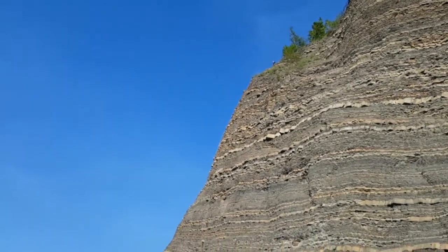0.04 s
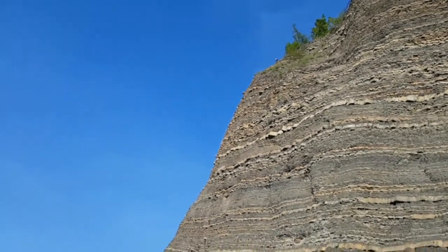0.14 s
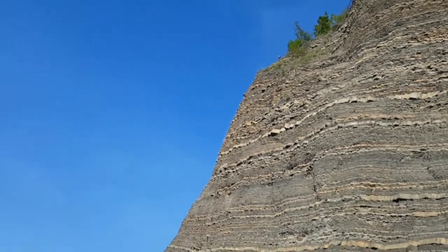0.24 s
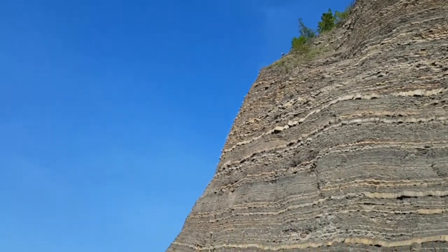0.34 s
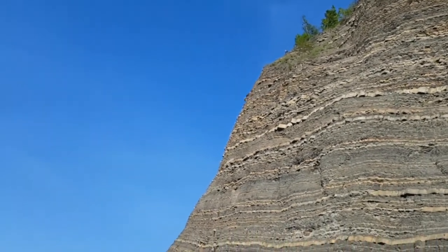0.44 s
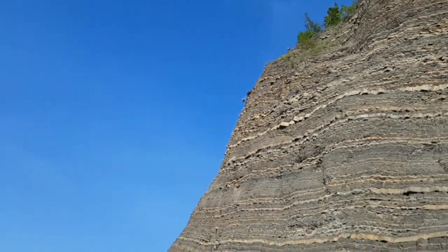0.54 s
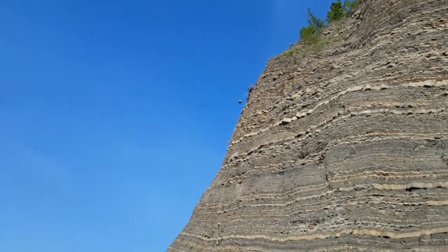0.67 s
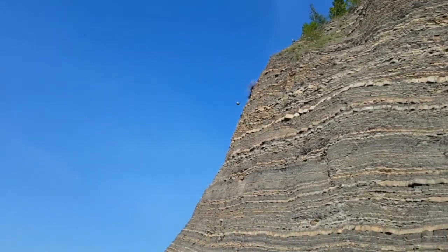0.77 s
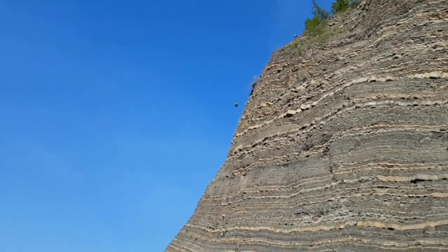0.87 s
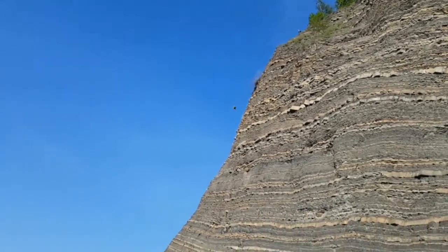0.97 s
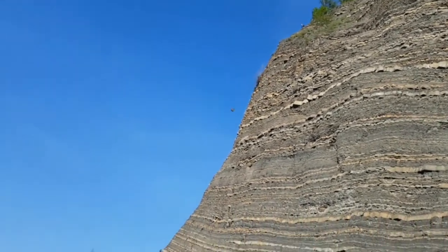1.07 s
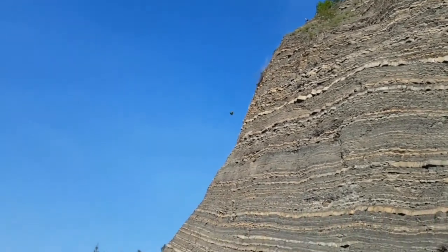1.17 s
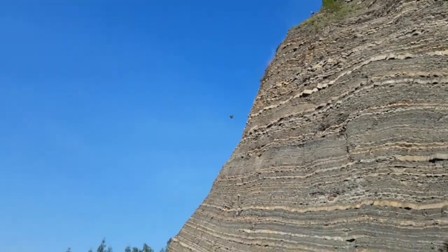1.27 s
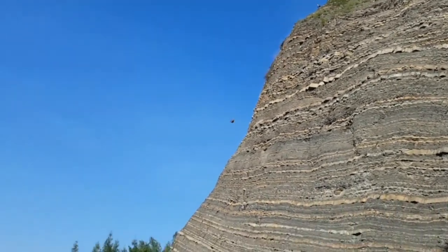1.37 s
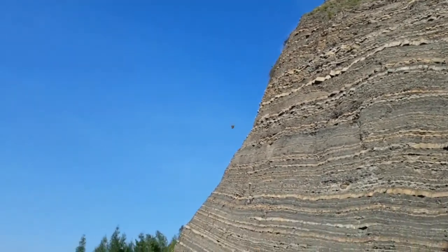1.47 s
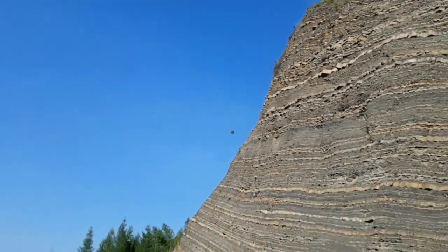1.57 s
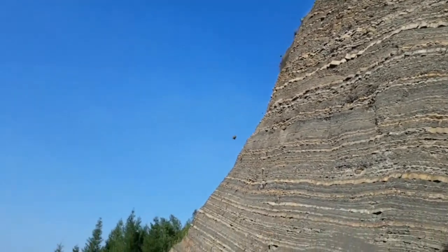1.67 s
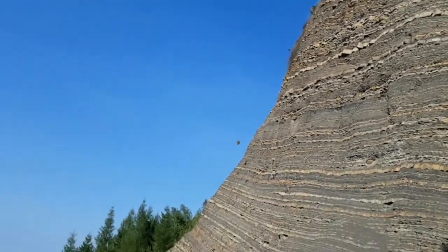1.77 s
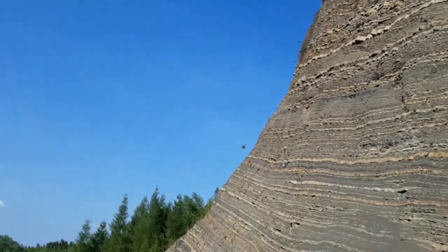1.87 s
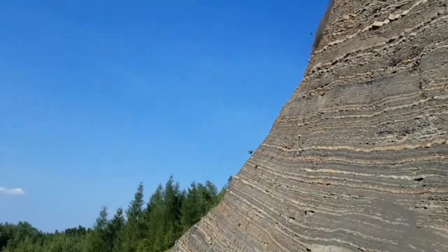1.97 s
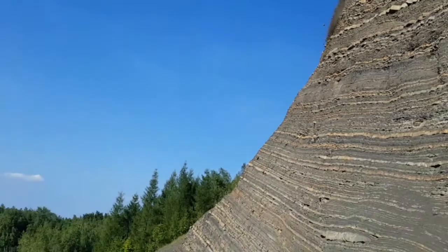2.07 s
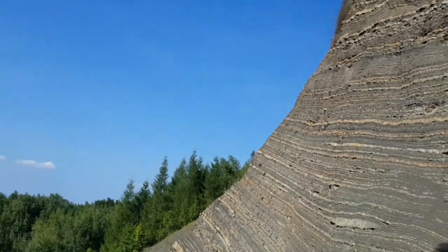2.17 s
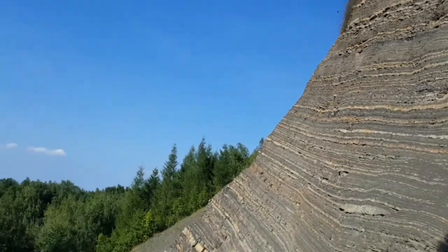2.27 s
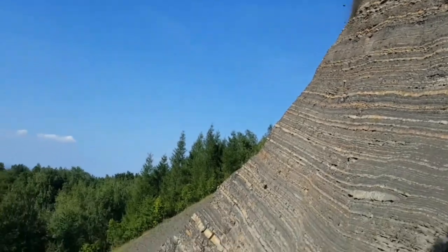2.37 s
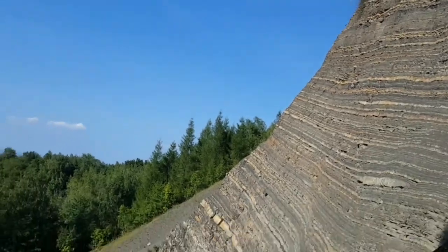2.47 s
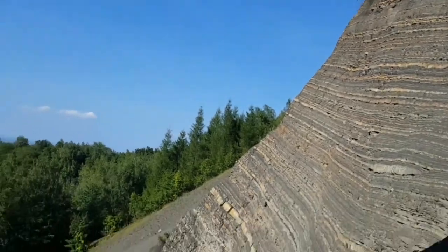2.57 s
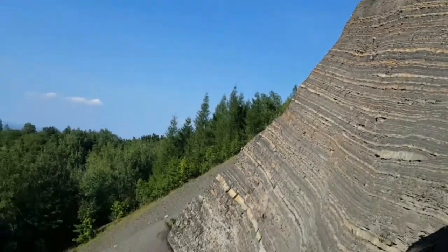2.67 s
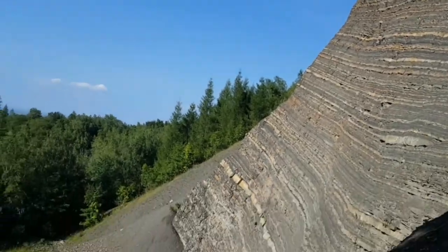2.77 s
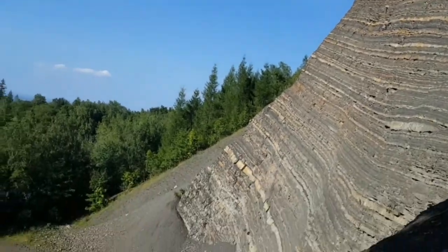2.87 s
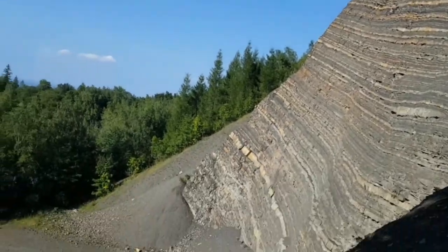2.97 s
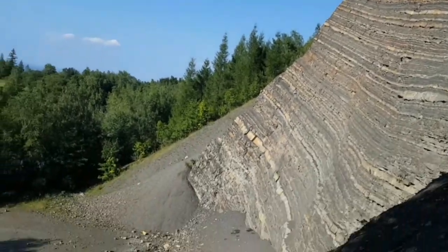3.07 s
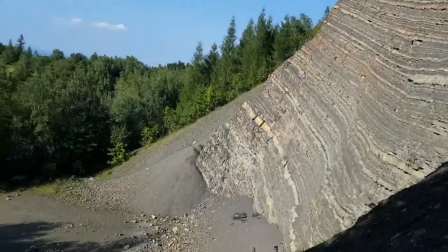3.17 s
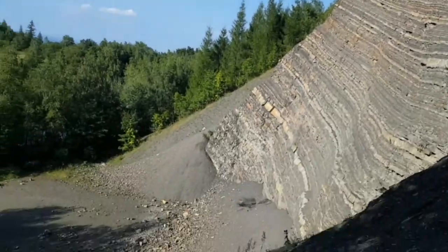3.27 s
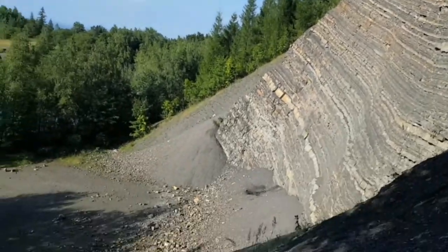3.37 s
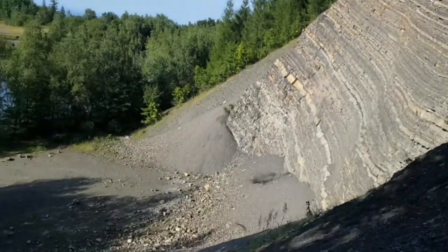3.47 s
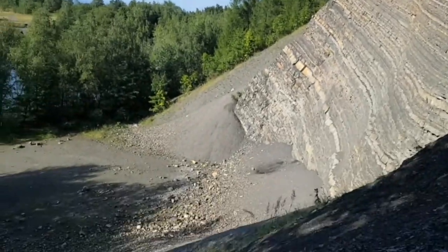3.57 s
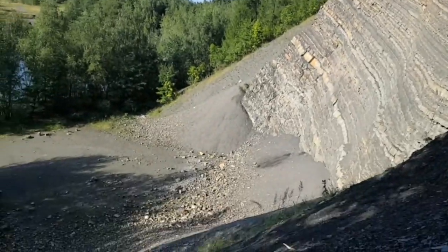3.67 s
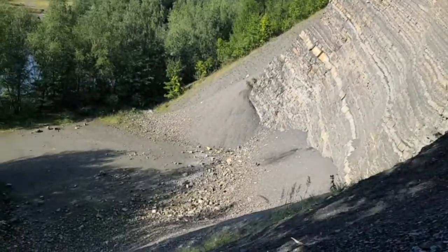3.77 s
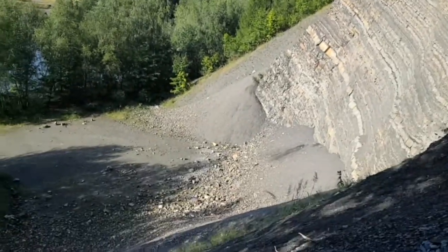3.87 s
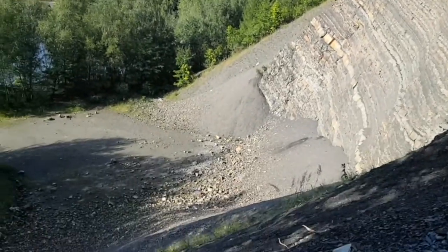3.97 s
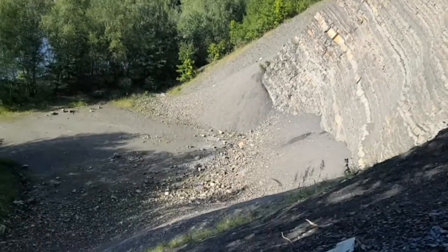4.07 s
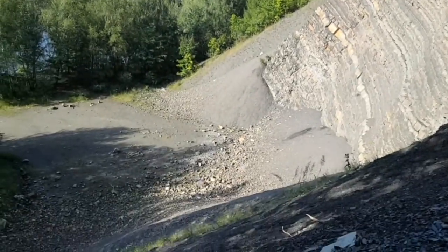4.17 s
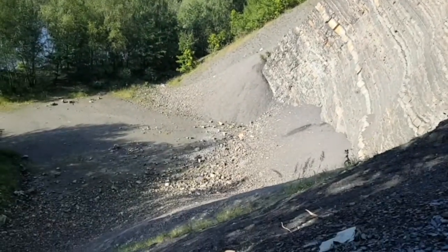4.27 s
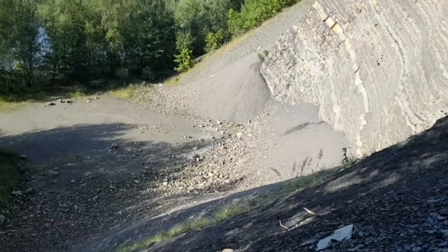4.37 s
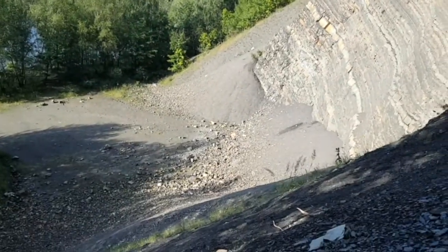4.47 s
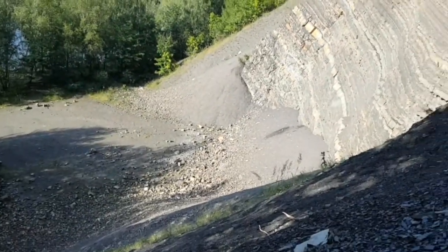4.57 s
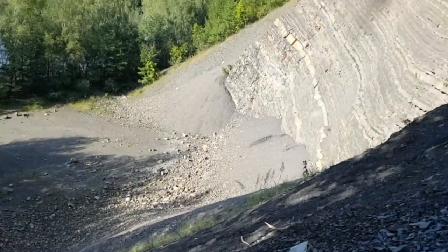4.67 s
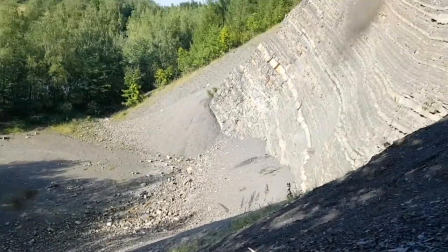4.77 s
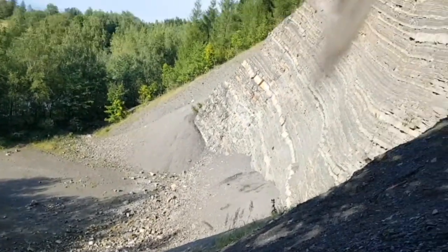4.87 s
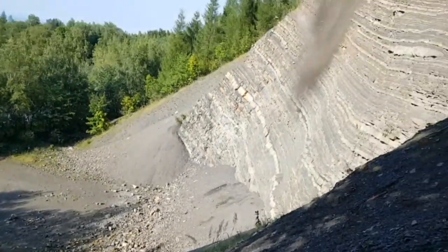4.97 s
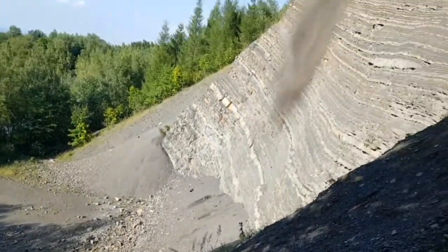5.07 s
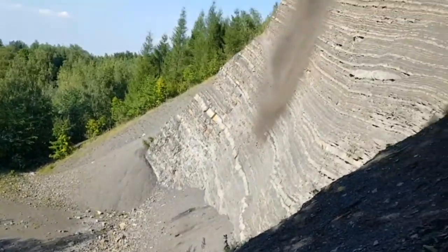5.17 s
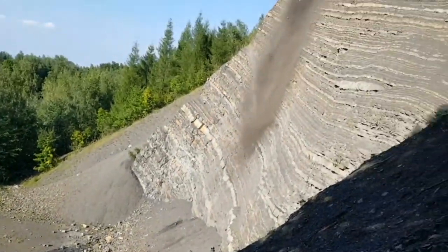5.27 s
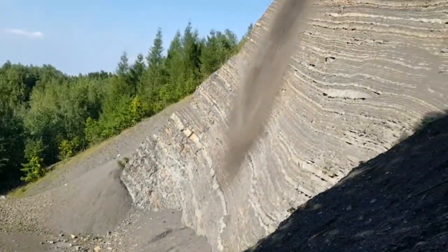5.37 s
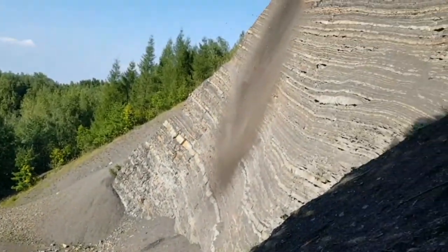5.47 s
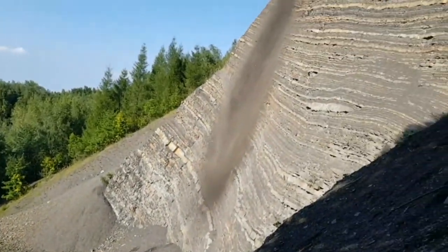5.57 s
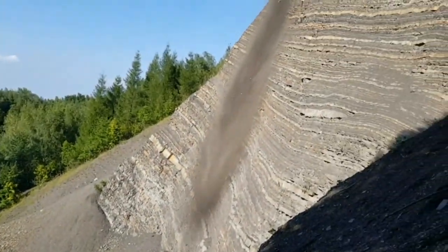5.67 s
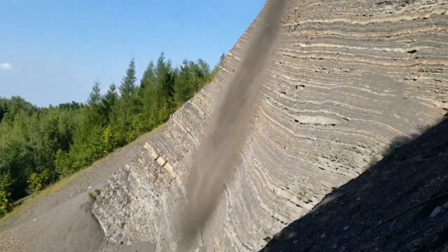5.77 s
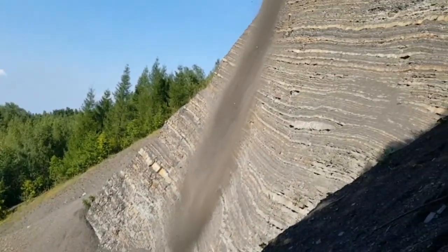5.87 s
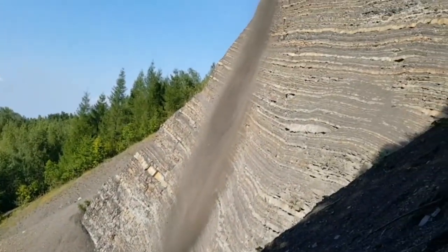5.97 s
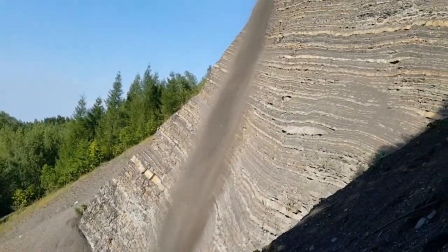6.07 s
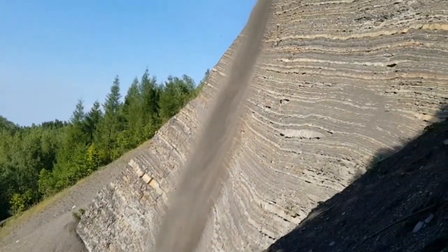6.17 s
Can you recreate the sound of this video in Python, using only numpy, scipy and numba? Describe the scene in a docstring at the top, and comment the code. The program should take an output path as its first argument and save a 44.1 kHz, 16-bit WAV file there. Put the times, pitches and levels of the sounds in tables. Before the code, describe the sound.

It opens very quietly outdoors, with a thin, distant trickle of grit on a shale cliff. A light knock comes at once, and a sharper crack with splinters at about 0.6 seconds. Small ticks, snaps and faint pebble slides follow while the trickle slowly grows. From about 2.3 seconds the knocks quicken, and near 2.8 a loud cluster of cracks and low thuds marks rocks landing in loose stones. Irregular knocks, thuds and bright snaps continue, with a very sharp crack at 3.7 and a heavy pile of blows around 4.1. More land between 4.4 and 4.9, then hard knocks at 5.3 and again around 5.9 to 6.1. Underneath, a hissing, rattling stream of gravel swells with a low rolling rumble, strongest when the sound ends just after 6 seconds. The big blows echo briefly off the quarry walls and trees.

```python
"""Rocks break off a shale cliff and bound down it, cracking, knocking on ledges and thudding into the
loose stones below. Behind them a stream of gravel and grit swells, with small pebble slides, a low
rumble and a faint stir of air in the wood. Every hit, big or tiny, is a tone that dies in a few cycles.
Two spaced microphones hear each hit directly and again off the ground; the big blows also echo
from the quarry walls and the trees."""
import sys
import numpy as np
from scipy import signal
from scipy.io import wavfile
from scipy.ndimage import uniform_filter1d
from numba import njit

SR = 44100
rng = np.random.default_rng(int(sys.argv[2]) if len(sys.argv) > 2 else 0)


def bounce(signal):
    """Save signal as a 16-bit WAV file at the path given by the first command-line argument."""
    frames = np.transpose(np.atleast_2d(signal))
    limited = np.clip(frames, -1, 1)
    pcm = np.round(limited * 32767).astype(np.int16)
    wavfile.write(sys.argv[1], SR, pcm)


N = 274743
TIME_S = np.arange(N) / SR

# How loud the stream of gravel is as it swells: time_s, grit_db, stones_db
STREAM_LEVELS = [(0.0, -63, -70), (0.43, -70, -75), (0.62, -62, -72), (0.78, -57.5, -65),
                 (0.96, -63.5, -77.5), (1.2, -58, -68), (1.59, -51.5, -63.5), (2.12, -42.5, -61),
                 (2.45, -40, -58), (2.93, -33.5, -52), (3.25, -33, -50), (3.7, -30, -47),
                 (4.1, -25.5, -38.5), (4.6, -25.5, -37.5), (5.1, -24.5, -42.5), (5.4, -22, -39.5),
                 (5.9, -21, -38.5), (6.23, -19.5, -40.5)]
TRICKLE_DB = -54  # grit quieter than this is a thin, distant trickle
LANDING_S = 2.366  # when the fall reaches the loose stones at the foot of the cliff


def leaves():
    """Air stirs faintly through the wood: a soft, low band of noise."""
    air = signal.lfilter(*signal.butter(2, (230, 480), "band", fs=SR), rng.standard_normal(N))
    return undb(-72.5) * air / air.std()


def rumble(start_db=-80.5, grow_db_per_s=7):
    """A faint low rumble grows as the fall comes nearer."""
    low = signal.lfilter(*signal.butter(2, 95, fs=SR), rng.standard_normal(N))
    return undb(start_db + grow_db_per_s * TIME_S) * low / low.std()


def undb(db):
    """Turn decibels into a plain multiplier."""
    return 10 ** (np.asarray(db) / 20)


@njit
def add_rings(out, peak, lag, hz, cycles, size):
    """Each hit swells to its peak and dies away, `lag` later on the left. Times are in samples."""
    for hit in range(len(peak)):
        decay = cycles[hit] * SR / hz[hit] / 4
        step = np.exp(complex(-1 / decay, 2 * np.pi * hz[hit] / SR))  # turns and shrinks the tone
        for ch in range(2):
            start = peak[hit] - decay + (.5 - ch) * lag[hit]
            first = max(int(start) + 1, 0)
            tone = size[hit] * np.e / decay * step ** (first - start)
            for i in range(first, min(first + int(9 * decay), out.shape[1])):
                out[ch, i] += (i - start) * tone.imag
                tone *= step


def strike(time_s, hz, cycles, level_db, side=0, ground_db=-7.0, width_ms=0.27):
    """Hits across the slope (`side`: -1 left to 1 right), heard directly and off the ground."""
    # Where the fall is, given as delays: time_s, left_lag_ms, ground_echo_ms
    fall_path = [(0, 0.046, 2.4), (1.0, 0.1, 1.63), (2.2, 0.085, 1.67), (2.9, 0.15, 2.01),
                 (4.3, 0.21, 1.87), (5.3, 0.05, 2.06), (6.23, -0.14, 1.68)]
    path_s, lag_ms, echo_ms = np.transpose(fall_path)
    lag = (np.interp(time_s, path_s, lag_ms) + width_ms * side) * SR / 1000
    # hits at different heights have slightly different paths off the ground
    scatter_ms = .075 * rng.standard_normal(len(time_s))
    echo_s = time_s + (np.interp(time_s, path_s, echo_ms) + scatter_ms) / 1000
    hz = np.minimum(hz, .45 * SR)
    cycles = np.maximum(cycles, .3) * np.ones(len(time_s))
    size = undb(level_db) * rng.choice([-1, 1], len(time_s))  # each hit pushes or pulls the air
    out = np.zeros((2, N))
    add_rings(out, time_s * SR, lag, hz, cycles, size)
    add_rings(out, echo_s * SR, lag, hz, cycles, size * undb(ground_db))
    return out


def landed(rise_s=0.43):
    """0 while the fall is high on the cliff, rising to 1 once it meets the stones below."""
    return np.clip((TIME_S - LANDING_S) / rise_s, 0, 1) ** 2


def cut_bass(sound, cut_hz=200):
    """Hits on the bare cliff have no bass."""
    return signal.lfilter(*signal.butter(3, cut_hz, "high", fs=SR), sound)


def bass_on_landing(sound):
    """Bass grows in only as the fall comes down to the ground."""
    high = cut_bass(sound)
    return high + landed() * (sound - high)


def pebble_slides(count=1500, attack_share=0.17):
    """Pebbles of one size skitter together: a narrow rustle that sets in quickly and thins out."""
    # Small slides down the cliff: start_s, length_s, level_db, pitch_hz, rise_octaves, ring_cycles
    slides = [(-0.05, 0.58, -67, 1670, 0.01, 6.2), (0.769, 0.19, -62, 2570, 0.011, 3.4),
              (1.302, 0.59, -63.5, 1500, 0.05, 10.2), (1.45, 0.8, -68, 2140, 0.1, 30),
              (5.348, 0.2, -42.5, 1960, 0.01, 14)]
    start_s, length_s, level_db, hz, rise_octaves, cycles = np.transpose(slides)
    progress, size, place = rng.random((3, count, len(slides)))
    spread_octaves = rng.standard_normal(progress.shape) / cycles  # narrower for longer rings
    pebble_hz = hz * 2 ** (rise_octaves * progress + spread_octaves)
    swell = np.minimum(progress / attack_share, (1 - progress) / (1 - attack_share))
    pebble_db = level_db + 20 * np.log10(swell + 1e-3) - np.log(size + 1e-4)
    time_s = (start_s + progress * length_s).ravel()
    return strike(time_s, pebble_hz.ravel(), np.tile(cycles, count), pebble_db.ravel(), place.ravel() - .5)


def gushes(per_s=22, depth_db=1.0):
    """The stream comes in uneven gushes: a volume that wanders a little."""
    hold = int(SR / per_s)
    steps = np.repeat(rng.standard_normal(N // hold + 1), hold)[:N]
    return undb(depth_db * uniform_filter1d(steps, hold))


def swarm(grain, level_db):
    """Countless small collisions, a few much bigger; `level_db` has one value per STREAM_LEVELS row."""
    low_hz, high_hz, hits_per_s, cycles, scatter_db, tilt_db_per_octave = grain
    stream_s, grit_db, _ = np.transpose(STREAM_LEVELS)
    when, size, pitch, place = rng.random((4, int(hits_per_s * N / SR)))
    time_s = when * N / SR
    octaves = pitch * np.log2(high_hz / low_hz)
    # small pieces ring high and briefly, so they need 6 dB more per octave for the same power
    hit_db = -scatter_db * np.log(size + 1e-4) + (6.0 + tilt_db_per_octave) * octaves
    if low_hz > 1000:  # a thin trickle high on the cliff is far away, and the air dulls it
        thin_db = np.maximum(TRICKLE_DB - np.interp(time_s, stream_s, grit_db), 0)
        hit_db -= 0.9335 * thin_db * (octaves - octaves.mean())
    hits = strike(time_s, low_hz * 2 ** octaves, cycles, hit_db, side=2 * place - 1)
    return hits / hits.std() * undb(np.interp(TIME_S, stream_s, level_db))


def gravel_stream():
    """All sizes pour down: fine stuff gushes, lone pebbles tick, boulders roll once the fall lands."""
    # Kinds of grain: low_hz, high_hz, hits_per_s, ring_cycles, scatter_db, tilt_db_per_octave
    grit = (2450, 8650, 12500, 1.35, 1.46, 0.093)
    dust = (8000, 17000, 12496, 3.5, 0.5, -18.5)
    pebbles = (653, 2340, 3000, 2.97, 1.63, 0.1)
    ticks = (1500, 6000, 60, 1.2, 2.5, -3)
    stones = (257, 840, 897.5, 2.62, 2.6, 0.7)
    small_rocks = (120, 906, 110, 2.5, 1.4, -7)
    boulders = (47, 262, 420, 2.6, 1.2, 10)
    _, grit_db, stones_db = np.transpose(STREAM_LEVELS)
    dust_db = grit_db - 4.5 - 0.7 * np.maximum(TRICKLE_DB - grit_db, 0)  # fainter still in a trickle
    pebbles_db = stones_db + 0.57 * (grit_db - stones_db) - 2.5  # follows both grit and stones
    fine = gushes() * swarm(grit, grit_db)
    fine += gushes() * swarm(dust, dust_db)
    fine += gushes() * swarm(pebbles, pebbles_db)
    coarse = swarm(ticks, grit_db - 14.5) + swarm(stones, stones_db)
    growth = undb(2 * (TIME_S - LANDING_S))  # 2 dB a second
    rolling = growth * swarm(boulders, np.full_like(stones_db, -42.5))
    tumbling = swarm(small_rocks, stones_db - 7.5)
    return bass_on_landing(fine + coarse) + landed() * (rolling + tumbling)


def quarry_echo(sound, fade_s=0.77, wood_delay_s=0.281, wood_spread_s=0.059):
    """The quarry walls give a thin wash of echoes; the wood answers later, smeared over many trunks."""
    t = np.arange(SR) / SR
    walls = rng.standard_normal((2, SR)) * undb(-60 * t / fade_s) * np.clip(t / 0.0042, 0, 1)
    wood = rng.standard_normal((2, SR)) * np.exp(-((t - wood_delay_s) / wood_spread_s) ** 2)
    tail = walls + undb(-12) * wood
    tail = tail + 0.87 * tail[:1]  # both sides share part of the echo
    tail = signal.lfilter(*signal.butter(2, (680, 5700), "band", fs=SR), tail)
    tail /= np.sqrt(np.sum(tail ** 2, axis=1, keepdims=True))
    return signal.fftconvolve(sound, tail, axes=1)[:, :N]


def chips(start_s, level_db, length_ms, low_hz, high_hz, fade_db=19.0, tilt_db=0.0, count=30):
    """Chips fly off each blow, the later ones fainter."""
    progress, pitch, smallness = rng.random((len(start_s), count, 3)).T
    time_s = start_s + progress * length_ms / 1000
    hz = low_hz * (high_hz / low_hz) ** pitch
    chip_db = level_db - fade_db * progress - 8 * smallness + tilt_db * pitch
    side = .5 * (smallness - .5)
    return strike(time_s.ravel(), hz.ravel(), cycles=1.93, level_db=chip_db.ravel(), side=side.ravel())


def thuds():
    """Heavy rocks land in loose stones with a low, short ring."""
    # One landing a row: time_s, level_db, pitch_hz, ring_cycles
    landings = [(0.09, -43.5, 254, 1.1), (0.59, -29, 472, 4.76), (2.6522, -34, 184, 0.91),
                (2.7697, -13, 310, 1.86), (2.9158, -11.5, 300, 2.02), (3.154, -15.5, 145, 1.3),
                (3.221, -17.5, 93, 0.9), (3.3007, -17.5, 228, 1.2), (3.541, -22.5, 215, 0.69),
                (3.936, -16, 78, 0.28), (4.0575, -9.5, 238, 2.9), (4.0744, -7.5, 186, 3.7),
                (4.087, -13, 180, 1.6), (4.327, -25, 184, 4), (4.3517, -9, 225, 1.73),
                (4.4862, -12.5, 206, 1.96), (4.653, -16.5, 167, 1.4), (4.689, -8, 198, 2.4),
                (4.8082, -12, 198, 1.7), (4.835, -22, 167, 2.7), (4.898, -19.5, 206, 0.85),
                (4.969, -18, 246, 1.15), (5.3385, -18, 159, 3.2), (5.4186, -15, 182, 1.43),
                (5.4938, -22, 227, 1.7), (5.617, -21, 181, 1.8), (5.7202, -19, 141, 1.1),
                (5.7714, -17, 138, 1.7), (5.82, -16, 288, 1.5), (5.936, -21.5, 172, 3.7),
                (6.0202, -13.5, 282, 3.3)]
    time_s, level_db, hz, cycles = np.transpose(landings)
    return strike(time_s, hz, cycles, level_db, ground_db=-14.0)


def knocks():
    """Rocks knock on ledges, shedding bright chips and a few pieces near the knock's own pitch."""
    # One knock a row: time_s, level_db, pitch_hz, ring_cycles, chips_db
    ledge_hits = [(0.0901, -29, 760, 0.96, -53), (0.5884, -25, 780, 1.8, -47.5),
                  (0.6021, -34, 537, 1.6, -48), (0.6116, -39, 845, 2.5, -51), (1.179, -52, 620, 2.5, -68),
                  (1.196, -53, 640, 2.1, -64), (1.2115, -53, 640, 2.3, -56.5),
                  (1.6118, -38.5, 650, 1.4, -55), (1.8792, -38.5, 610, 2.7, -54),
                  (2.2666, -32.5, 656, 3.3, -41.5), (2.37, -37, 750, 3.4, -55),
                  (2.4187, -21.5, 626, 2.56, -57), (2.467, -36, 800, 2.8, -48),
                  (2.4931, -32, 845, 5.6, -53), (2.5527, -31, 706, 2, -46), (2.594, -30.5, 720, 1.8, -40),
                  (2.6996, -24.5, 620, 1, -39), (2.7586, -12.5, 520, 1.45, -24),
                  (2.77, -7.5, 481, 3.34, -24.5), (2.807, -15, 646, 1.3, -27), (2.818, -17, 1500, 2.7, -26),
                  (2.873, -15.5, 830, 0.56, -36), (2.8875, -16, 725, 0.93, -31),
                  (2.915, -8.5, 517, 1.9, -31), (3.0312, -17.5, 610, 3.6, -30.5),
                  (3.1049, -24, 890, 2.1, -54), (3.125, -26, 910, 1.6, -38), (3.2227, -21.5, 724, 3.8, -24),
                  (3.3003, -15.5, 830, 3.9, -26.5), (3.4574, -26, 600, 1.9, -48),
                  (3.6608, -14.5, 910, 0.81, -29), (3.7436, -18, 1110, 4.6, -33),
                  (3.801, -28.5, 1010, 2.8, -32), (3.858, -23, 965, 4.4, -33), (3.896, -22.5, 840, 2, -31),
                  (3.9356, -20, 680, 2.5, -31), (4.0574, -13, 900, 2.3, -19), (4.073, -5.5, 1000, 6.2, -23),
                  (4.082, -19, 950, 4.5, -21.5), (4.1018, -15, 544, 1.8, -27.5),
                  (4.109, -12, 886, 2.8, -20), (4.114, -12, 1080, 3.4, -27), (4.35, -21, 695, 2.9, -25),
                  (4.4843, -13.5, 870, 3.4, -29), (4.4913, -14, 950, 4.3, -40),
                  (4.525, -15.5, 1030, 5.9, -27), (4.654, -22.5, 450, 4.2, -38),
                  (4.6886, -16, 1430, 6.8, -27), (4.8074, -11.5, 470, 1.8, -23.5),
                  (4.888, -16, 1440, 4, -26.5), (4.897, -17, 790, 3.5, -24.5),
                  (5.334, -5.5, 1130, 1.4, -33), (5.3431, -5.5, 1120, 1.9, -33),
                  (5.3516, -12.5, 666, 4.5, -30), (5.5049, -19.5, 700, 3.3, -29),
                  (5.7143, -22, 1120, 3.1, -26.5), (5.761, -19, 616, 4.6, -37), (5.825, -18, 620, 1.7, -29),
                  (5.8852, -10.5, 950, 0.49, -26.5), (5.9, -17, 466, 3.1, -25.5),
                  (5.9062, -8, 700, 2.2, -24.5), (6.0192, -14, 700, 2.06, -38),
                  (6.0614, -16.5, 565, 2.34, -25), (6.153, -22, 450, 2, -50)]
    time_s, level_db, hz, cycles, chips_db = np.transpose(ledge_hits)
    out = cut_bass(strike(time_s, hz, cycles, level_db, ground_db=-21.0))
    out += chips(time_s - .001, chips_db + 13, length_ms=14, low_hz=1200, high_hz=4350, tilt_db=-1)
    out += chips(time_s - .001, chips_db + 6.5, length_ms=12, low_hz=4000, high_hz=14500)
    pieces = chips(time_s, level_db - 5, length_ms=29.07, low_hz=0.41 * hz, high_hz=1.57 * hz,
                   tilt_db=-2, count=12)
    return out + bass_on_landing(pieces)


def cracks():
    """Plates of shale snap, with a bright burst of splinters and a longer spray."""
    # One snap a row: time_s, level_db, pitch_hz, ring_cycles, splinters_db
    plate_snaps = [(0.5886, -20.5, 2700, 2.7, -34), (0.589, -22, 4370, 4.1, -31),
                   (0.619, -38, 4400, 5.9, -29.5), (0.709, -38, 2450, 3.8, -34.5),
                   (1.469, -29, 1960, 3.5, -36), (1.471, -30, 3750, 4.5, -31),
                   (1.7814, -25, 4100, 1.8, -43), (2.689, -14.5, 4770, 5.7, -31),
                   (2.76, -16, 2720, 2.1, -24), (2.8251, -9.5, 1620, 4, -13), (2.8708, -15, 5100, 6.4, -10),
                   (2.888, -16, 5500, 8.8, -12), (3.2218, -17, 3560, 4.8, -16.5),
                   (3.3019, -16, 1470, 2.4, -15), (3.4086, -8.5, 4760, 2.6, -17.5),
                   (3.607, -9, 2640, 1.1, -20), (3.655, -18, 4690, 4.4, -10), (3.7394, 1.5, 3040, 2.3, -10),
                   (3.744, -5.5, 2220, 3.8, -15), (3.948, -4, 5560, 1.8, -12.5),
                   (4.063, -12, 3300, 12, -26), (4.071, -14, 3280, 11, -21), (4.1104, -21, 4150, 4.6, -9),
                   (4.115, -6, 3250, 6.4, -18), (4.237, -17.5, 4250, 14, -8), (4.4335, -10, 2060, 1.5, -22),
                   (4.4861, -15, 2070, 7.1, -12), (4.653, -18, 2160, 6, -10), (4.719, -18, 2820, 2.7, -8.5),
                   (5.053, -35, 3700, 1.9, -10), (5.3347, -17, 1330, 2.4, -6.5),
                   (5.463, -18, 1490, 3.5, -17), (5.5806, -14.5, 2000, 3.9, -29),
                   (5.716, -13, 1490, 3.7, -32), (6.055, -7, 2100, 3.6, -10), (6.174, -16, 3770, 1.6, -20)]
    time_s, level_db, hz, cycles, splinters_db = np.transpose(plate_snaps)
    snaps = strike(time_s, hz, cycles, level_db, ground_db=-11.0)
    burst = chips(time_s - .001, splinters_db - 4.5, length_ms=12, low_hz=1580, high_hz=14000,
                  fade_db=20, tilt_db=6)
    spray = chips(time_s, splinters_db - 5, length_ms=45, low_hz=1740, high_hz=13800, count=60)
    return snaps + burst + spray


def scene():
    """The big blows and their echoes, over the stream, the slides and the quiet background."""
    blows = thuds() + knocks() + cracks()
    hiss = undb(-68) * rng.standard_normal((2, N))  # the microphones' own noise
    background = hiss + leaves() + rumble()
    return background + pebble_slides() + gravel_stream() + undb(-11.5) * quarry_echo(blows) + blows


def record(dry, low_cut_hz=70, top_hz=15680, ceiling=1.6):
    """Each microphone opening weakens a few pitches; bass and top are cut and peaks are rounded."""
    # Dips in the tone, left list then right list: pitch_hz, width_hz, level_db
    microphone_dips = [(5300, 7500, -2.5), (9140, 2250, -6)], [(59.7, 60, -4), (9610, 3950, -12.5),
                       (12440, 6500, -0.5)]
    out = signal.lfilter(*signal.butter(2, low_cut_hz, "high", fs=SR), dry)
    for ch, dips in enumerate(microphone_dips):
        for hz, width_hz, level_db in dips:
            band = signal.lfilter(*signal.iirpeak(hz, hz / width_hz, fs=SR), out[ch])
            out[ch] -= (1 - undb(level_db)) * band
    out = ceiling * np.tanh(out / ceiling) - 0.0005  # the converter sits slightly off zero
    return signal.sosfilt(signal.ellip(14, .2, 80, top_hz, fs=SR, output="sos"), out)


dry = scene()
out = record(dry)
bounce(out)
```